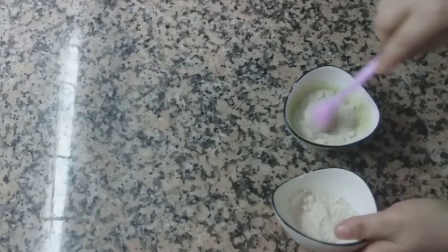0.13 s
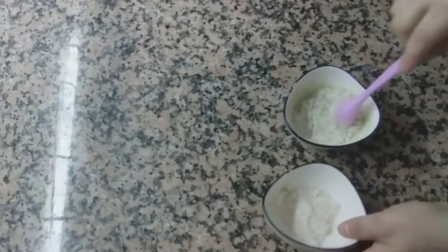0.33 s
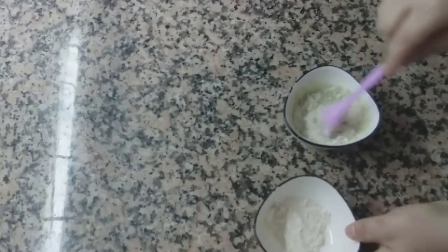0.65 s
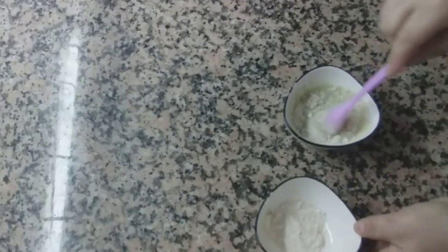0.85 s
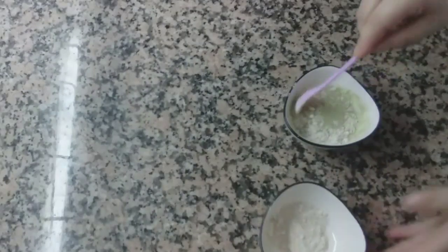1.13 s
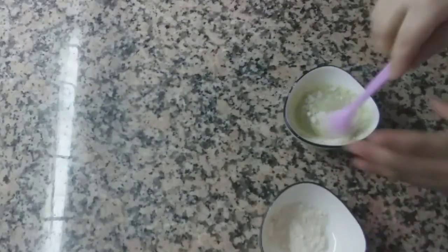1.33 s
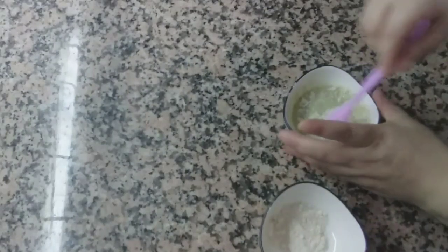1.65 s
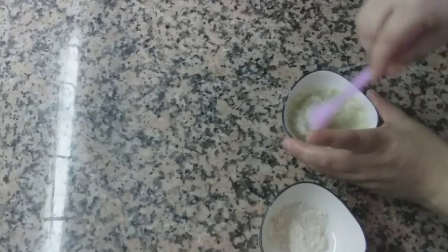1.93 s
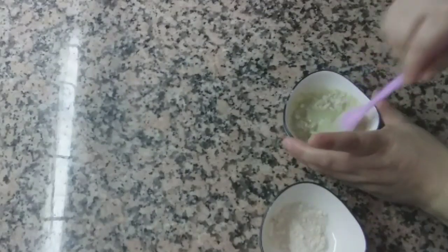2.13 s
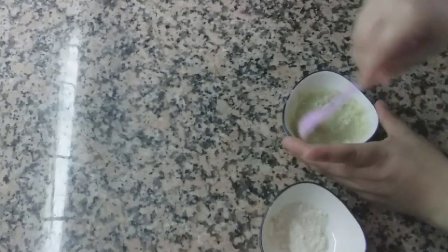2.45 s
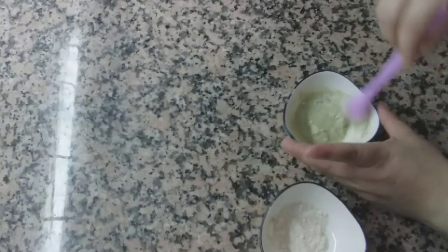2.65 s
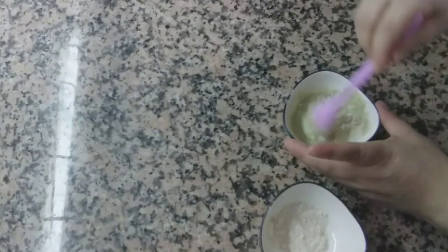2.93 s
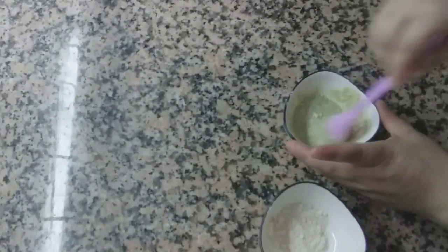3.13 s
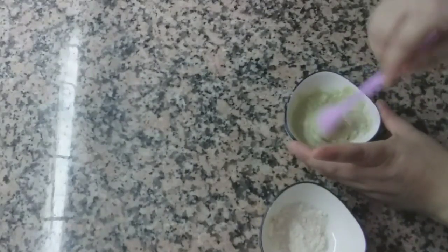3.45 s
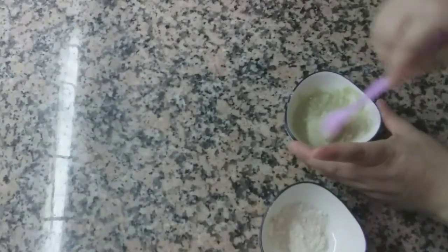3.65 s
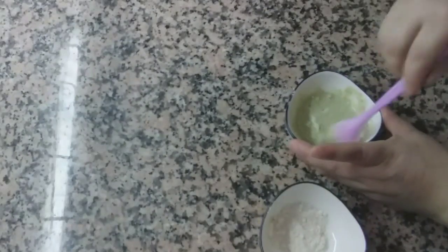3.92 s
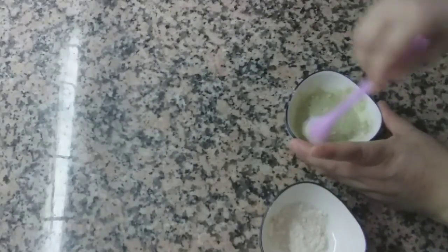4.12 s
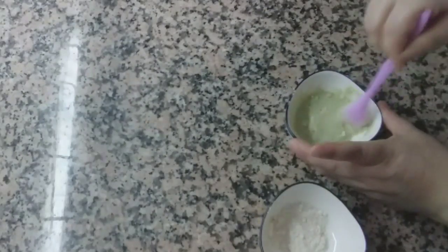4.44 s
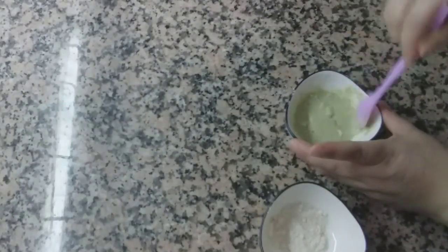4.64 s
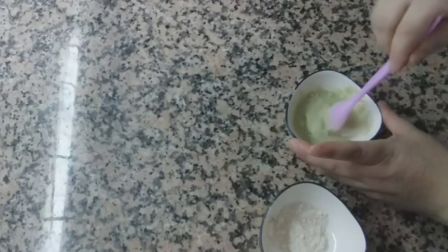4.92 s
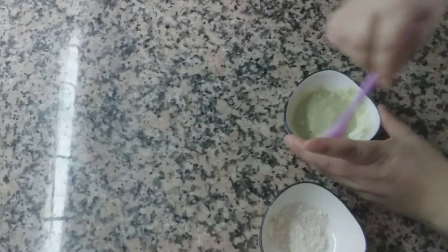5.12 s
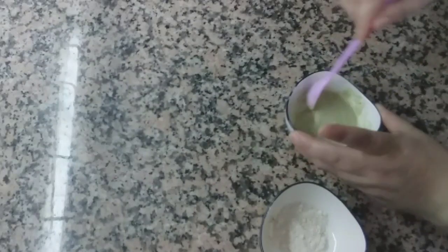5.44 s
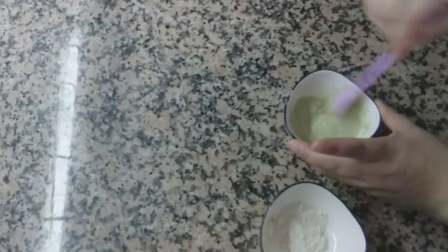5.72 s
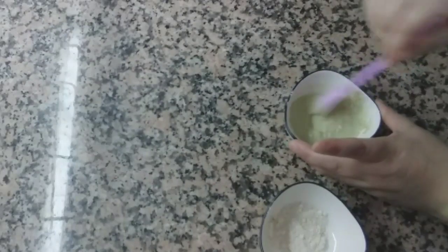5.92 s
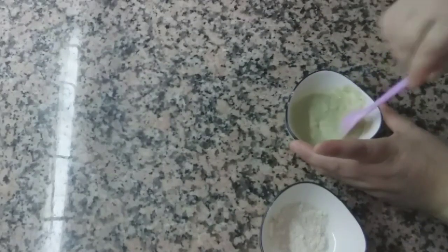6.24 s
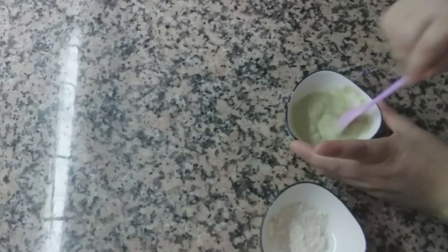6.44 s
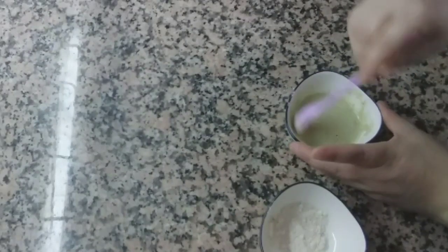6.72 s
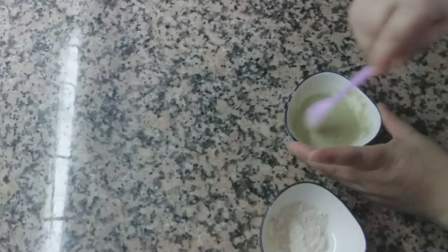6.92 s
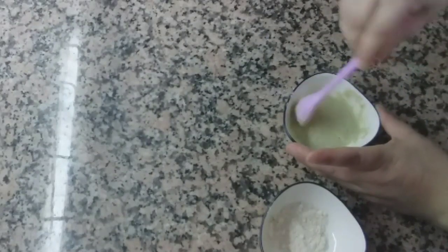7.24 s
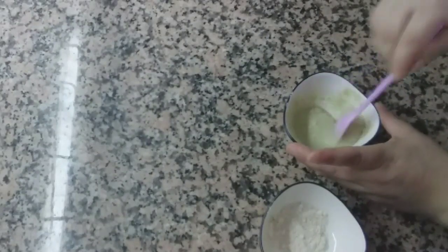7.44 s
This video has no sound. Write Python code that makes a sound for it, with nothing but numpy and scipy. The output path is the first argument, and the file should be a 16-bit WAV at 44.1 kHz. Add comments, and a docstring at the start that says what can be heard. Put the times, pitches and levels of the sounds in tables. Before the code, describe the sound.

In a small hard kitchen with a low hum, a ceramic bowl of flour is set on stone: a loud double clack, a fast rattle with high ringing, then weaker rocking taps. A soft plastic spoon then stirs thick paste in another bowl, with quiet crunching, wet pops, hollow ticks and occasional moderate knocks of the bowl on stone. Close microphone, short lively room tail.

```python
"""In a small, hard kitchen with a low hum, a ceramic bowl of flour is set down on a stone worktop.
It clacks, rattles and rocks once more: colored clicks for the clack, decaying sines for the ring.
A plastic spoon stirs thick paste in a second bowl: resonant ticks, crunching noise and gliding drags.
The paste pops in wet clicks, and now and then the hand-held bowl knocks on the stone.
Close surfaces return single echoes, and the room adds a decaying tail and standing waves."""
import sys
import numpy as np
from scipy import signal
from scipy.fft import rfft
from scipy.io import wavfile

SR = 44100
rng = np.random.default_rng(int(sys.argv[2]) if len(sys.argv) > 2 else 0)


def file_out(sig):
    """Save sig as 16-bit WAV at sys.argv[1]."""
    # one column per channel
    cols = np.atleast_2d(sig).T
    # limit, then scale
    lim = np.clip(cols, -1, 1)
    pcm = np.round(lim * 32767).astype(np.int16)
    wavfile.write(sys.argv[1], SR, pcm)


N = 333852
TIME = np.arange(N) / SR

# The flour bowl's foot meets the stone and rattles to rest:
# (time [s], relative level [dB], first gap [s], length [s], extra thud [dB], rim ring [dB])
LANDINGS = [(0.3596, -12, .008, 0.002, -3, -1.5), (0.414, -13, .033, 0.1117, -1.5, 0),
            (0.8683, -33.5, 0.00675, .022, 1, -18.5), (0.944, -69.5, .007, .005, 0.5, 22.5),
            (1.035, -21, .0076, .03, -2.5, -7.5), (1.0583, -21, .009, .04, -6, 6),
            (1.1141, -26, .0055, 0.0215, -2.5, 3.5)]
# The mixing bowl knocks on the stone:
# (time [s], relative level [dB], extra thud [dB], rim ring [dB], extra treble [dB])
KNOCKS = [(2.023, -30.5, -5.5, 1.5, 5), (2.736, -22.5, -30.5, -15.5, 10.5), (2.7408, -26, 5.5, 11, 7),
          (5.6259, -25, -3.5, -18.5, -1.5), (5.669, -26.5, 0.5, 1.5, 7.5), (6.6139, -36, -1, -6.5, -4.5),
          (6.8924, -31.5, -6.5, -6.5, 0), (7.2687, -36.5, -9.5, -8, -3), (7.4362, -33.5, -4.5, -24, 0.5)]
# The spoon meets the paste-coated wall: (time [s], relative level [dB], hardness [dB], pitch [Hz])
TICKS = [(2.1856, -45, 0, 1512), (3.5798, -47, 0.5, 1610), (3.8074, -43, -16.5, 1500),
         (4.159, -40.5, -3, 1581), (4.3542, -52, -5, 1580), (4.552, -46, -0.5, 1620),
         (4.709, -42.5, -1, 1580), (4.939, -45.5, 5, 1614), (5.0827, -40.5, 0, 1480),
         (5.844, -47, -4.5, 1517), (6.102, -43, -4, 1608), (6.35, -41, -2.5, 1589), (6.4962, -40, -6, 1624),
         (7.0621, -38.5, -3.5, 1512)]
# Air pockets open in the paste: (time [s], relative level [dB], extra treble [dB])
POPS = [(0.652, -54.5, 9.5), (0.74, -47, -2.5), (1.9923, -40, -2), (2.1361, -38, -3.5), (2.2179, -42.5, -2),
        (2.875, -33, 6), (3.1535, -45, 5.5), (3.2341, -44, -3), (3.2859, -36.5, -2)]
# Relative level of the stirring: (time [s], level [dB])
STIRRING = [(1.5, -103.5), (1.75, -70.5), (2.02, -85), (2.77, -72.5), (2.92, -71.5), (3.92, -77),
            (4.86, -78.5), (5.27, -66.5), (5.4, -77.5), (6.62, -77), (6.81, -69.5), (7.26, -77),
            (7.57, -75)]
# The spoon drags along the wall, swelling and fading:
# (time [s], length [s], relative level [dB], start pitch [Hz], end pitch [Hz])
DRAGS = [(0.866, 0.043, -40, 349, 464.7), (1.735, .09, -63.5, 1195, 1373), (3.547, 0.03, -50, 1495, 1612),
         (4.783, 0.26, -59, 285, 353.9), (5.0, .17, -59.5, 380, 430), (5.198, 0.1805, -49.5, 943, 853),
         (5.522, 0.19, -59.5, 800, 830)]
# The spoon squeaks faintly on the glaze: (time [s], length [s], pitch [Hz], relative level [dB])
SQUEAKS = [(2.389, .03, 6670, -66), (3.065, 0.07817, 7255, -90), (3.324, 0.054, 6190, -70.5),
           (6.721, 0.0134, 6690, -55), (6.768, 0.124, 6470, -67.5), (7.14, 0.048, 6845, -66)]

# Color of the flour bowl's clack on stone: (frequency [Hz], relative level [dB])
LANDING_COLOR = [(30, -50), (80, -17), (125, -2), (190, -12.5), (320, 0), (600, -7.5), (800, -3.5),
                 (1070, -7.5), (1300, 0), (1580, -1), (1900, 1), (2550, -9), (3200, -6), (4000, -17),
                 (7500, -33.5), (15500, -39.5)]
# Color of the mixing bowl's knock on stone: (frequency [Hz], relative level [dB])
KNOCK_COLOR = [(40, -73), (120, -3.5), (190, -26), (280, -2.5), (400, -1), (580, -4.5), (780, 2),
               (1000, -3), (1600, 3), (2600, -7), (3250, -7), (4000, -16.5), (6500, -30.5), (8200, -37),
               (15500, -44)]
# Color of a spoon tick at the reference pitch TICK_HZ: (frequency [Hz], relative level [dB])
TICK_COLOR = [(100, -34.5), (400, -4), (600, -16.5), (740, 0), (930, -27.5), (1250, 1.5), (1560, 5),
              (2100, -5.5), (2650, -24.5), (3150, -10.5), (4100, -19.5), (5500, -27), (8000, -37.5),
              (15500, -47)]
# Color of a bursting air pocket: (frequency [Hz], relative level [dB])
POP_COLOR = [(100, -29.5), (600, -9), (1400, 3), (2200, 0.5), (3300, -0.5), (4700, -1), (6500, -15),
             (8500, -25.5), (15500, -32.5)]
# Color of the flour grains' crunch: (frequency [Hz], relative level [dB])
CRUNCH_COLOR = [(150, -10), (400, 5.0), (900, 0.5), (1500, -2.5), (2500, -3.5), (4200, -2.5),
                (6600, -8), (8200, -24.5), (15500, -15.5)]

# Ringing modes of the flour bowl: (frequency [Hz], relative level [dB], t60 [s])
FLOUR_BOWL = [(3080, -19, .17), (3205, -12, .26), (3252, -1.5, .35), (5940, -26, .05), (6930, -22, .13),
              (7125, -23, .26), (8435, -30, .28), (9750, -33, .15), (11010, -28, .31), (12330, -32, .31),
              (13630, -37, .24), (14910, -33, .29)]
# Ringing modes of the mixing bowl: (frequency [Hz], relative level [dB], t60 [s])
MIXING_BOWL = [(759, -15, 0.231), (1287, -12.5, 0.083), (1800, -5, 0.0567), (2122.2, -17, 0.4),
               (3182.5, -0.5, 0.045), (3340, -36.5, .2), (4787.6, -21.5, 0.062), (6984, -19.5, 0.035),
               (10040, -36.5, 0.039), (10800, -36, 0.099), (12380, -30, .15)]
# The spoon's blade rings for a moment against the paste: (frequency [Hz], relative level [dB], t60 [s])
SPOON = [(1501.4, 2.5, 0.00667), (1777, -15.5, 0.0107), (9380, -21.5, 0.0103)]

# Worktop, wall and cupboards around the direct sound: (delay [s], gain [linear])
ECHOES = [(.00195, 0.24), (.0046, 0.47), (.0082, 0.43), (0.014, 0.37), (0.0157, 0.29), (0.0237, 0.27),
          (0.0259, .2), (.0335, 0.2)]
# The kitchen's decay: (frequency [Hz], t60 [s])
KITCHEN = [(120, 0.27), (400, 0.53), (1000, 0.5223), (2000, 0.3943), (4000, 0.5237), (8000, .42),
           (15000, 0.56)]
# Standing waves that stand out of the decay: (frequency [Hz], energy [dB])
STANDING_WAVES = [(121, -20), (390, -30.5), (521, -26.5), (796, -24), (1142, -30.5), (1259, -29),
                  (1297, -24.5), (1452, -33.5), (1510, -36.5), (1605, -39.5), (1799, -29.5), (1840, -27.5),
                  (1975, -33), (2093, -27)]
# Color of the steady background: (frequency [Hz], relative level per Hz [dB])
AIR = [(22, -54.5), (44, -28), (60, -8.5), (88, -19.5), (130, -1), (160, -4.5), (200, -15), (275, -11.5),
       (400, -18), (700, -28.5), (1200, -39), (2600, -41.5), (5000, -37), (7000, -39.5), (8200, -48),
       (15500, -47.5)]
# Narrow bands in the background: (frequency [Hz], width [Hz], level [dB])
HUM = [(124.3, 7.5, -65), (278.1, 43, -71.5), (3110, 170, -81), (3181, 56, -78.5), (5120, 510, -81)]

GAP_KEPT, LAST_GAP_S = .53, .007  # share of the gap's distance to its last value kept per bounce
SETTLE_DB, SETTLE_BEND = 31.5, 1.3  # the bounces weaken over a rattle, slowly at first
RING_DETUNE = .002  # each landing contact shifts the modes by up to this share
RING_SOFTENING = 1.5  # weak contacts wake the ring much less
TICK_HZ = 1560
TICK_THUD_DB, TICK_TREBLE_DB = -1.5, -2  # a harder tick adds to both
REST_DB = -83  # relative rubbing level before the first stirring point
DRAG_WIDTH_HZ, SLIPS_PER_S = 370, 880
OVERTONE, OVERTONE_DB, OVERTONE_WIDTH_HZ = 2.1, -14, 540  # OVERTONE is a multiple of the drag's pitch
TICK_ROOM_DB, RING_ROOM_DB = -3, -8.5  # share sent into the kitchen's decay
EDGE_HZ = 15780


def flour_bowl_landings():
    """Ceramic on stone: each contact gives a dull clack and the bowl's own ring, returned apart."""
    clacks, rings = np.zeros((2, N))
    for s, db, first_gap, length, thud_db, rim_db in LANDINGS:
        click = blow(LANDING_COLOR, thud_db, 0.36 * rim_db)
        for delay, loss_db in bounces(first_gap, length):
            at = s + delay
            stretch = 1 + RING_DETUNE * rng.uniform(-1, 1)
            clack = chatter(click, share=0.78, decay_s=0.0032)
            add(clacks, at, amp(db + loss_db + 35.5) * clack)
            bowl_ring = ring(FLOUR_BOWL, rim_db, start=at, stretch=stretch)
            add(rings, at, amp(db + RING_SOFTENING * loss_db - 5) * bowl_ring)
    return clacks, rings


def bounces(first_gap, length, count=10):
    """A rattle's contacts as (delay s, dB): gaps approach a fast chatter while the level falls."""
    gaps = LAST_GAP_S + (first_gap - LAST_GAP_S) * GAP_KEPT ** np.arange(count)
    delays = np.cumsum(gaps) - gaps
    delays = delays[delays < length]
    return [(delay, -SETTLE_DB * (delay / length) ** SETTLE_BEND) for delay in delays]


def mixing_bowl_knocks():
    """The hand-held bowl hits the stone once per knock: a clack and a ring, returned apart."""
    clacks, rings = np.zeros((2, N))
    for s, db, thud_db, rim_db, treble_db in KNOCKS:
        click = blow(KNOCK_COLOR, thud_db, treble_db)
        add(clacks, s, amp(db + 32.5) * chatter(click, share=1.0, decay_s=0.00418))
        add(rings, s, amp(db + 4.5) * ring(MIXING_BOWL, rim_db))
    return clacks, rings


def waver(x, rate_hz, depth):
    """Slow noise makes the bowls' ring swell and fade unevenly."""
    lowpass = signal.butter(2, rate_hz, fs=SR, output="sos")
    drift = evened(signal.sosfilt(lowpass, rng.standard_normal(N)))
    return x * (1 + depth * drift)


def spoon_ticks(size=2000):
    """Soft plastic on coated glaze: a short hollow tick whose pitch depends on where it lands."""
    out = np.zeros(N)
    for s, db, hard_db, hz in TICKS:
        stretch = hz / TICK_HZ
        click = blow(TICK_COLOR, TICK_THUD_DB + hard_db, TICK_TREBLE_DB + hard_db, stretch)
        add(out, s, amp(db + 36.5) * chatter(click, share=0.54, decay_s=0.0042))
        add(out, s, amp(db + 1.0) * ring(SPOON, hard_db, size, stretch=stretch))
    return out


def paste_pops():
    """Each air pocket tears open in a tight cluster of wet clicks."""
    out = np.zeros(N)
    for s, db, treble_db in POPS:
        click = blow(POP_COLOR, 0, treble_db)
        add(out, s, amp(db + 23.0) * chatter(click, share=1.94, decay_s=0.0056))
    return out


def rubbing():
    """Flour grains crunch under the spoon, which sticks and slips on the wall and sometimes squeaks."""
    present = rng.random(N) < 2500 / SR  # about 2500 grains a second
    grains = present * amp(0.7 * np.minimum(rng.exponential(1, N), 5))
    crunch = coloured(grains * rng.standard_normal(N), CRUNCH_COLOR)
    level_db = np.interp(TIME, *np.transpose(STIRRING), left=REST_DB)
    out = amp(level_db + 6.0) * crunch
    for s, length, db, start_hz, end_hz in DRAGS:
        add(out, s, amp(db) * drag(length, start_hz, end_hz))
    for s, length, hz, db in SQUEAKS:
        size = int(length * SR)
        squeak = resonate(rng.standard_normal(size), hz, width=370)
        add(out, s, amp(db) * np.hanning(size) * squeak)
    return out


def drag(length, start_hz, end_hz):
    """One drag of the spoon: random slips excite a gliding resonance under an arch of pressure."""
    size = int(length * SR)
    slips = (rng.random(size) < SLIPS_PER_S / SR) * rng.standard_normal(size)
    pitch = np.linspace(start_hz, end_hz, size)
    groan = resonate(slips, pitch, DRAG_WIDTH_HZ)
    overtone = resonate(slips, OVERTONE * pitch, OVERTONE_WIDTH_HZ)
    pressure = np.sin(np.linspace(0, np.pi, size))
    return pressure * (groan + amp(OVERTONE_DB) * overtone)


def blow(colour, thud_db, treble_db, stretch=1, size=4096):
    """A causal click of a given color; heavy blows add bass, hard ones treble."""
    hz = abs(np.fft.fftfreq(size, 1 / SR))
    bass = 1 / (1 + (hz / 950) ** 4)
    treble = 1 - 1 / (1 + (hz / 2800) ** 6)
    gain_db = read(colour, hz / stretch) + thud_db * bass + treble_db * treble
    # minimum phase: the energy comes as early as the color allows
    spectrum = np.exp(np.conj(signal.hilbert(np.log(amp(gain_db)))))
    click = np.fft.ifft(spectrum).real
    # bending waves travel slower at low pitch, which spreads the click over a millisecond
    for _ in range(6):
        click = signal.lfilter([-.8, 1], [1, -.8], click)
    return click


def chatter(click, share, decay_s, size=1500):
    """One clean push carries the body; tiny further contacts carry the treble and roughen the rest."""
    grit = rng.choice([-1., 1.], size) * np.exp(-np.arange(size) / SR / decay_s)
    grit /= np.linalg.norm(grit)
    lowpass = signal.butter(2, 4200, fs=SR, output="sos")
    highpass = signal.butter(3, 4200, "high", fs=SR, output="sos")
    body = signal.sosfilt(lowpass, signal.unit_impulse(size) + share * grit)
    fizz = signal.sosfilt(highpass, grit)
    return signal.fftconvolve(click, body + np.hypot(1, share) * fizz)


def ring(modes, rim_db, size=16000, start=0, stretch=1):
    """Dying modes of a struck thing; rim_db weights those above 2 kHz, start sets their phase."""
    t = np.arange(size) / SR
    out = np.zeros(size)
    for hz, db, t60 in modes:
        level = amp(db + rim_db * (hz > 2000))
        decay = np.exp(-np.log(1000) * t / t60)
        out += level * decay * np.sin(2 * np.pi * hz * (start + stretch * t))
    return out


def near_echoes(x):
    """The direct sound plus single echoes from worktop, wall and cupboards."""
    out = x.copy()
    for delay, gain in ECHOES:
        add(out, delay, gain * x)
    return out


def kitchen_tail(count=2000):
    """Sparse taps of random sign, each band dying at its own speed; energy one."""
    taps = np.zeros(SR)
    at = ((np.arange(count) + rng.random(count)) * SR / count).astype(int)
    taps[at] = rng.choice([-1., 1.], count)
    hz, t, z = signal.stft(taps, SR, nperseg=256)
    decay = np.exp(-np.log(1000) * t / read(KITCHEN, hz)[:, None])
    tail = signal.istft(z * decay, SR, nperseg=256)[1]
    tail *= 1 - np.exp(-np.arange(len(tail)) / SR / 0.002)  # the reflections take a moment to gather
    return tail / np.linalg.norm(tail)


def standing_waves():
    """Single room resonances, dying at the kitchen's own rate."""
    t = np.arange(SR) / SR
    out = np.zeros(SR)
    for hz, db in STANDING_WAVES:
        decay = np.exp(-np.log(1000) * t / read(KITCHEN, hz))
        out += amp(db) * evened(decay * np.sin(2 * np.pi * hz * t))
    return out / np.sqrt(len(t))  # from an rms of one to an energy of one


def background():
    """A low appliance hum and faint higher bands, as resonant noise in a faint hiss."""
    hum = sum(amp(db) * resonate(rng.standard_normal(N), hz, width) for hz, width, db in HUM)
    return hum + amp(-59.5) * coloured(rng.standard_normal(N), AIR)


def amp(db):
    """Decibels to gain."""
    return 10 ** (np.asarray(db) / 20)


def evened(x):
    """Scales to an rms of one."""
    return x / np.sqrt(np.mean(x ** 2) + 1e-20)


def read(points, hz):
    """Reads a spectrum on a log-frequency axis."""
    f, value = np.transpose(points)
    return np.interp(np.log(hz + 1), np.log(f), value)


def add(mix, s, sound):
    """Mixes a sound in at a time in seconds."""
    part = mix[round(s * SR):][:len(sound)]
    part += sound[:len(part)]


def coloured(x, points):
    """Gives a long signal a spectrum, at an rms of one."""
    gain = amp(read(points, np.fft.rfftfreq(len(x), 1 / SR)))
    return evened(np.fft.irfft(rfft(x) * gain, len(x)))


def resonate(x, hz, width):
    """A steep resonance that can follow a pitch curve, at an rms of one."""
    turn = np.exp(2j * np.pi * np.cumsum(hz * np.ones(len(x))) / SR)
    r = np.exp(-np.pi * width / SR)
    # shift the pitch down to zero, smooth twice, shift back up
    smooth = signal.lfilter([1], [1, -2 * r, r * r], x / turn)
    return evened((turn * smooth).real)


def scene():
    """All sources, heard directly and through the kitchen, over its background."""
    room = kitchen_tail()[:SR] + standing_waves()
    floor = background()
    landing_clacks, landing_rings = flour_bowl_landings()
    knock_clacks, knock_rings = mixing_bowl_knocks()
    clacks = landing_clacks + knock_clacks
    ticks, pops, rubs = spoon_ticks(), paste_pops(), rubbing()
    rings = waver(landing_rings + knock_rings, rate_hz=25, depth=.3)
    direct = near_echoes(clacks + ticks) + amp(-1.0) * rings + pops + amp(-4.5) * rubs
    sent = amp(-0.4642) * clacks + amp(TICK_ROOM_DB) * ticks + amp(RING_ROOM_DB) * rings
    sent += amp(-3.5) * pops + amp(-3.0) * rubs
    reverberant = signal.fftconvolve(sent, room)[:N]
    return (direct + reverberant + floor)[None]


def record(dry):
    """The microphone signal is clipped at full scale, then low-passed at the band edge."""
    limited = np.clip(dry, -1, 1)
    lowpass = signal.firwin(255, EDGE_HZ, window=("kaiser", 8), fs=SR)
    return signal.oaconvolve(limited, lowpass[None], "same")


dry = scene()
out = record(dry)
file_out(out)
```